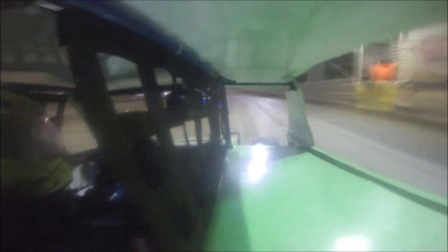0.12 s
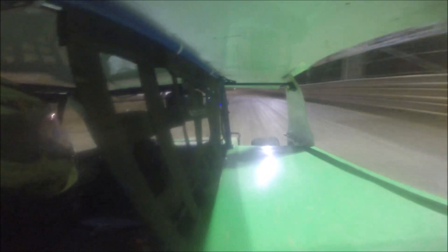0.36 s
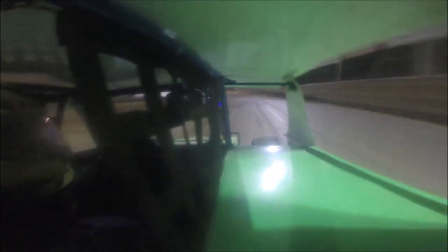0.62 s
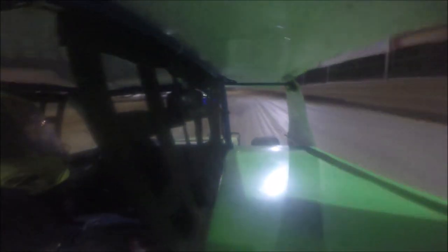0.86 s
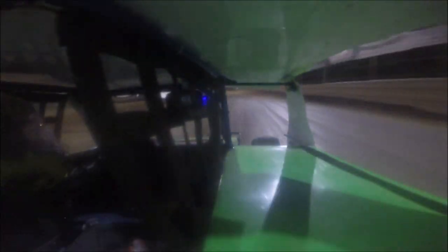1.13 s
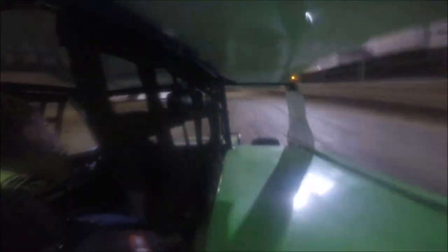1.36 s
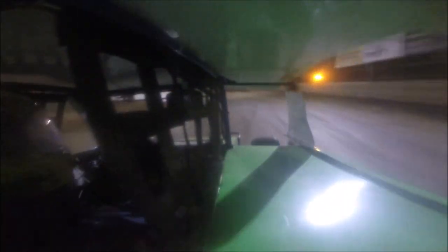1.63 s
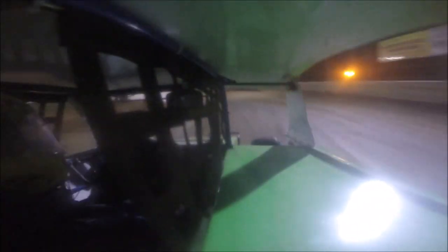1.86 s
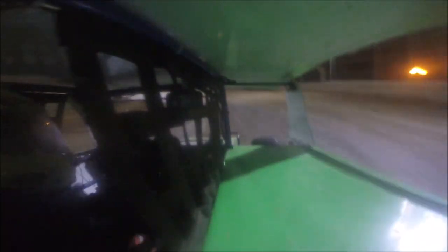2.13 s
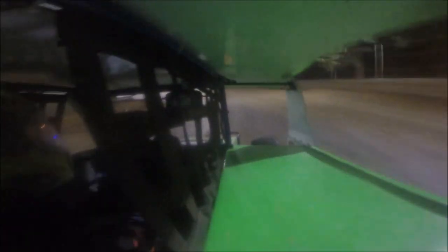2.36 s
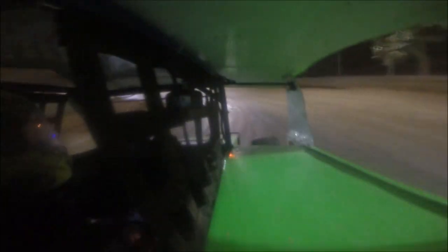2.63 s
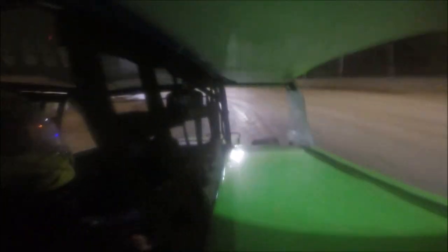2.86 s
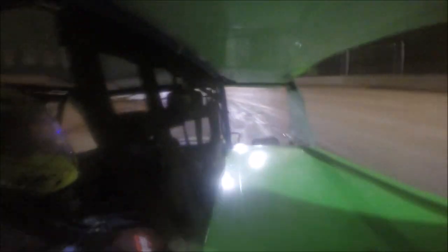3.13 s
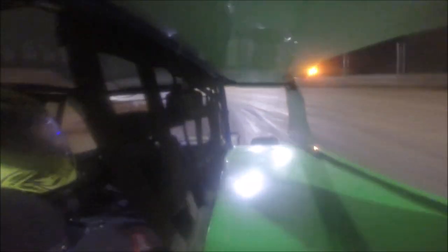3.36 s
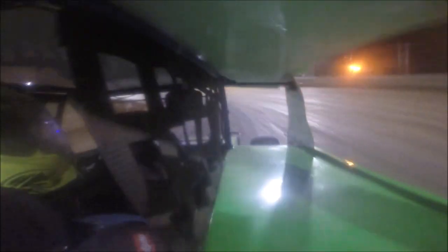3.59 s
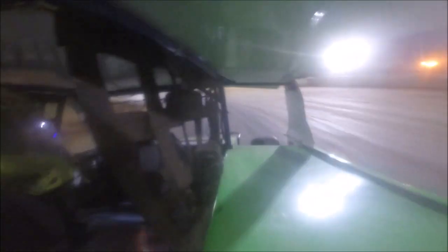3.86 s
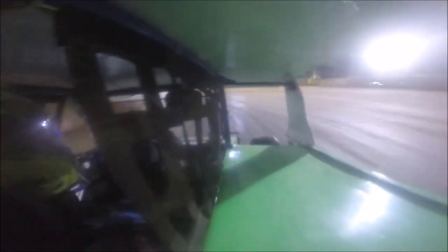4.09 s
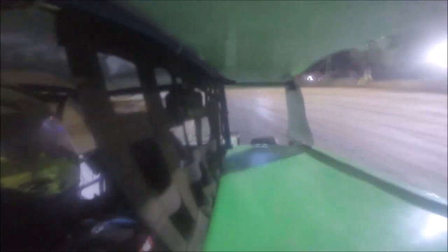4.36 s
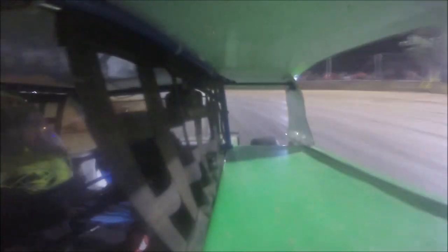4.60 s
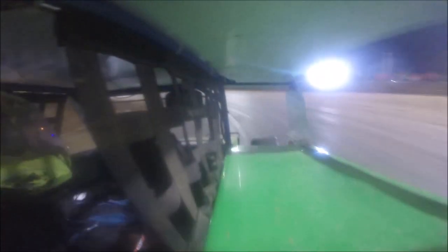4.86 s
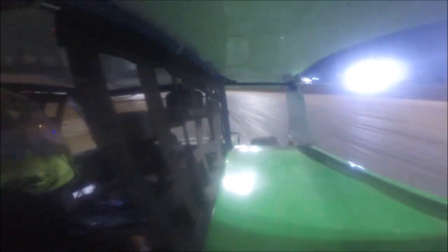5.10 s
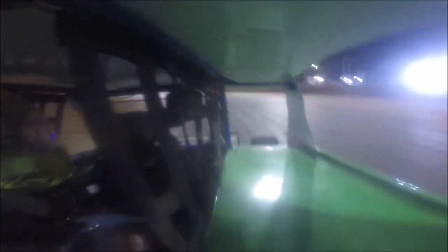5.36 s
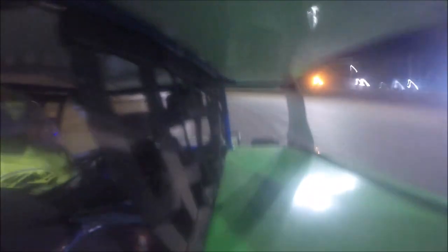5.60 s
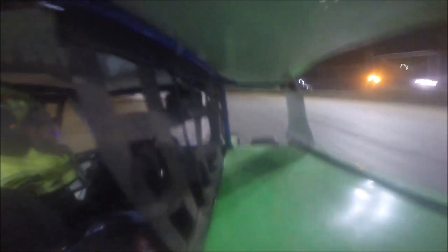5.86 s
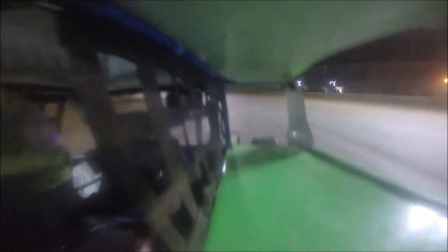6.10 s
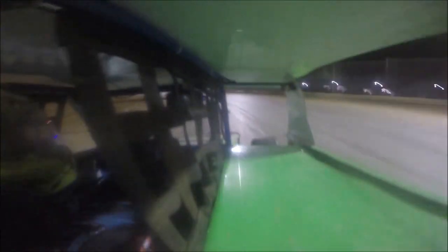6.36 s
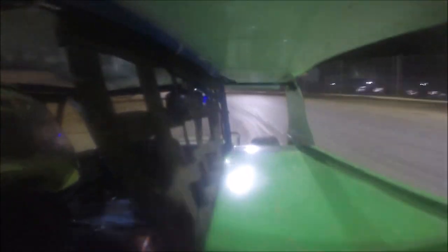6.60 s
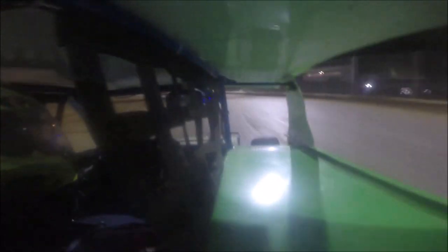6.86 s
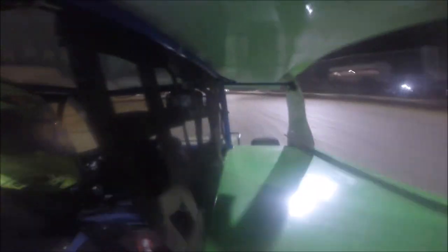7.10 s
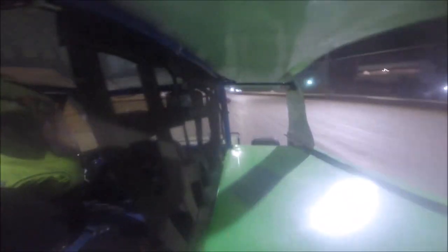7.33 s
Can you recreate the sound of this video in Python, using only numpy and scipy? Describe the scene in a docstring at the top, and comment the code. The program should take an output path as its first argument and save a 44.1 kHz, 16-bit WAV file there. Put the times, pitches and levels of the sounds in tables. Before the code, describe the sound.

A boomy, droning race engine holds high revs, broken up by ruts, with buzzing metallic panel rattle, fine ticking and low road rumble.

```python
"""Race car on dirt

Inside a race car's cockpit on a dirt track, heard by a microphone in a hard case on the cage. Engine tones, a
strong boom and low road noise come through the frame, with dull knocks from clods. Noisy knocks ring the sheet
panels and the case at their own pitches, swelling and breaking off. A bright click sounds at the crest of each
strong bass swing."""
import sys
import numpy as np
from scipy import signal
from scipy.fft import rfft, irfft
from scipy.io import wavfile
from scipy.ndimage import uniform_filter1d, map_coordinates

SR = 44100
rng = np.random.default_rng(int(sys.argv[2]) if len(sys.argv) > 2 else 0)


def natural_amplitude(level_db):
    """Convert a level in decibels to a linear amplitude factor, elementwise."""
    exponent = np.asarray(level_db, float) / 20
    return 10 ** exponent


def dump(signal):
    """Clip the signal to [-1, 1] and save it as 16-bit WAV at the path in sys.argv[1]."""
    limited = np.clip(np.atleast_2d(signal).T, -1, 1)
    pcm = np.round(limited * 32767).astype(np.int16)
    wavfile.write(sys.argv[1], SR, pcm)


N = 329427
TIME_S = np.arange(N) / SR

# Driving: part throttle through the rough turn, hard out of it, easing off from 6.6 s
# [t/s, engine cycle rate f/Hz, throttle 0-1, road rumble level/dB before the jolts shape it]
DRIVE = [(0, 29.75, 0.8, -15.5), (.55, 29.96, 0.8, -16), (.9, 30.77, 0, -16.5), (1.4, 31.44, 0.2, -17.5),
         (1.9, 32.04, 0.4, -17.5), (2.5, 31.83, .4, -20), (3.1, 31.96, 0.4, -16), (3.6, 31.53, 0.3, -20.5),
         (4.1, 30.76, 0.4, -15.5), (4.55, 31.07, 0.1, -20), (5.0, 31.49, 1, -18), (5.6, 33.66, 0.8, -17.5),
         (6.0, 34.81, 0.6, -19.5), (6.41, 35.82, 0.7, -19.5), (6.57, 35.36, 0.7, -23),
         (6.62, 35.06, 0.3, -20.5), (7.18, 33.95, 0, -23.5), (7.47, 33.9, 0.2, -23.5)]
# Ruts that break the boom, which swings up again and holds until the next
# [t/s of the break, boom level/dB after it, before the share and throb below]
RUTS = [(-0.03, -9), (0.045, -21), (0.115, -15), (0.169, -13.5), (0.266, -17.5), (0.334, -14), (0.426, -14),
        (0.601, -10.5), (0.767, -10), (0.835, -12.5), (1.021, -11), (1.119, -12.5), (1.236, -10.5),
        (1.344, -15), (1.411, -14.5), (1.506, -15), (1.619, -17.5), (1.742, -12), (1.859, -17), (2.03, -15),
        (2.112, -11.5), (2.208, -15.5), (2.333, -14.5), (2.419, -12), (2.573, -9), (2.67, -15.5),
        (2.773, -13.5), (2.907, -13), (3.027, -11), (3.091, -21), (3.19, -13), (3.254, -13), (3.369, -12.5),
        (3.554, -13.5), (3.684, -13), (3.763, -13.5), (3.894, -15), (4.047, -14), (4.096, -13.5),
        (4.228, -13), (4.291, -14), (4.364, -16), (4.545, -14.5), (4.639, -13.5), (4.702, -13.5),
        (4.826, -10.5), (4.884, -14), (4.966, -17.5), (5.084, -14), (5.213, -14), (5.329, -13),
        (5.451, -11.5), (5.509, -17), (5.598, -21.5), (5.697, -19.5), (5.856, -16), (6.007, -15),
        (6.113, -13.5), (6.166, -17.5), (6.256, -15), (6.398, -18.5), (6.452, -15.5), (6.547, -12.0),
        (6.681, -11.5), (6.812, -10.5), (6.935, -10), (7.398, -13)]
# Broad tone of the road noise in the frame [f/Hz, relative level/dB]
ROAD_TONE = [(15, -46.5), (26, -35), (33, -9.5), (50, -17), (85, -9), (130, -5.5), (190, -11), (300, -22.5),
             (450, -34.5), (650, -45), (1200, -65), (5000, -120)]
# Broad tone of the rattling panels and case [f/Hz, relative level/dB]
PANEL_TONE = [(300, -12), (600, -20.5), (1200, -15.5), (1700, -8.5), (2300, -12), (3000, -27),
              (4300, -26.5), (4700, -40.5), (7300, -41.5), (8000, -53.5), (11000, -58), (13000, -69.5),
              (15000, -79)]
# Broad tone of the clicks [f/Hz, relative level/dB]
TICK_TONE = [(300, -21.5), (2000, -2.5), (5000, 3.5), (7000, 3.5), (7700, -6), (11000, -15), (13000, -24.5),
             (15000, -40.5)]
# Resonances of the frame [f/Hz, width/Hz, level/dB]
FRAME_RESONANCES = [(40.7, 9, 12), (71.4, 11, 5.5), (143.16, 11, 12.5), (344.2, 54, 7), (480.6, 45, 12)]
# Resonances of panels and case; a minus level is a dip [f/Hz, width/Hz, level/dB]
PANEL_RESONANCES = [(945, 181, 14.5), (1062, 170, -10), (1484.4, 101, 8.5), (1595, 61, 4), (1859, 67, 10),
                    (1874.6, 14, -22.5), (2064, 110, -5), (2280, 160, 4), (2364, 155, 2), (3323, 88, 6.5),
                    (3500, 630, 8), (4920, 190, 6), (5380, 99, -6.5), (5520, 380, 11), (8300, 140, 11.5)]
# Rattle that builds up and breaks off [t/s of the break, gain level/dB, build-up/s, hush level/dB after]
RATTLE_SWELLS = [(0.377, 4.5, 0.023, -4), (0.687, 5.5, 0.11, 9), (1.068, 7, 0.38, -0.5),
                 (1.188, 5.5, 0.17, -1), (1.782, 8, 0.46, 2.5), (1.94, 6, 0.078, 13), (2.129, 6.5, 0.16, 0),
                 (2.38, 5.5, 0.29, 0), (2.619, 4, 1, -5), (2.8, 5, 0.073, 2), (3.058, 3, 0.88, -3.5),
                 (3.251, 5.5, 0.36, 0), (3.44, 3.5, 0.73, 1), (3.821, 6.5, 0.085, 1),
                 (3.97, 7, 0.062, -2.5), (4.169, 5, 0.26, 0), (4.49, 6, 0.14, -3), (4.792, 3.5, 0.17, -5),
                 (5.12, 4, 0.1, 0), (5.243, 7.5, 0.11, 0.5), (5.36, 4, 0.079, 0), (5.468, 3, 0.23, -0.5),
                 (5.57, 5.5, 0.043, 0), (5.752, 4.5, 0.27, -2.5), (6.12, -5, 0.14, -2.5),
                 (6.581, 4.5, 0.53, 0)]
# Edges of the bands for large to small sheets [f/Hz]
SHEET_EDGES = [200, 1100, 2050, 3000]
# Engine tones at multiples of the cycle rate, before jolts, mounts and wavering
# [multiple, level/dB at cruise, level change/dB per Hz of cycle rate, level change/dB per unit of throttle]
ENGINE_ORDERS = [(1, -44.5, 3.5, 11.5), (2, -29.5, 2, 0), (3, -35.5, 0.5, 5.5), (5, -29.5, -1, 11.5),
                 (6, -31.5, 0, 9.5), (7, -40, 1, 5.5), (8, -41, 0, 2.5), (9, -46.5, -0.5, 7),
                 (10, -50, 0, 10.5)]
# Resonances of mounts or exhaust that swell a passing order [f/Hz, width/Hz, level/dB at full throttle]
MOUNT_RESONANCES = [(34.7, 1.2, 10), (100.7, 11, 7.5), (255, 7.8, 9.5), (356, 18, 9.5)]
# Clods that hit the floor pan [t/s, level/dB before the fade]
CLODS = [(1.718, -15.5), (2.977, -19.5), (4.041, -22), (4.751, -25)]

CRUISE_HZ, CRUISE_THROTTLE = 31.5, 0.4
BOOM_ORDER = 4  # boom turns per engine cycle
BOOM_RISE_S, BOOM_FADE_S = 0.011, 0.019  # after a break and before the next
GAP_DB = -13  # depth of a break on the roughest ground
BOOM_SHARE_DB = -2  # the engine's part of a swing
SLIP_TURNS = 0.3  # how far a rut knocks the boom out of step on the roughest ground
THROB_DB, THROB_PER_S = 2, 24  # small ruts between the jolts; the dB is for the roughest ground
LOPSIDED = 0.22  # the frame gives more one way, so crests are pointed
PANELS_DB, PANELS_DB_PER_THROTTLE = -26.5, 3
BITS_DB, BITS_DB_PER_THROTTLE = 0.45, 3.5  # small loose parts against large sheets
FLEX_S = 0.0003  # typical drift of delay that bends the panel resonances
BREAK_S, RECOVER_S = 0.024, 0.14  # fall of the rattle into a hush, and its return
KNOCK_HZ, KNOCK_FADE_S = 331, 0.01


def curve(table):
    """Draw straight lines through each column of a table, one value a sample."""
    s, *columns = np.transpose(table)
    return [np.interp(TIME_S, s, c) for c in columns]


def unit(x):
    """Scale to rms 1."""
    return x / np.sqrt(np.mean(x ** 2))


def walk(rate):
    """Smooth chance that turns about rate times a second; spread 1."""
    k = int(SR / rate)
    steps = np.repeat(rng.standard_normal(N // k + 1), k)
    smooth = uniform_filter1d(uniform_filter1d(steps, k), k)
    return unit(smooth[:N])


def resonance(hz, centre_hz, width_hz):
    """Height of a resonance at hz: 1 at its centre, a half at half its width away."""
    return 1 / (1 + (2 * (hz - centre_hz) / width_hz) ** 2)


def colour(x, shape, modes=()):
    """Filter by a broad tone with resonances on top, sounding only after each input; scale to rms 1."""
    size = 2 ** 15
    hz = np.maximum(np.arange(size // 2 + 1) * SR / size, 1)
    shape_hz, shape_db = np.transpose(shape)
    db = np.interp(np.log(hz), np.log(shape_hz), shape_db)
    db = db + sum(top_db * resonance(hz, f, w) for f, w, top_db in modes)
    cepstrum = irfft(np.log(natural_amplitude(db)))
    # folding the cepstrum gives the least delay
    cepstrum[1:size // 2] *= 2
    cepstrum[size // 2 + 1:] = 0
    response = irfft(np.exp(rfft(cepstrum)))[:size // 2]
    return unit(signal.fftconvolve(x, response)[:N])


def jolts(rough):
    """Ruts cut the boom: its level in dB, the dips alone in dB, and a chance value held for each swing."""
    s, db = np.transpose(RUTS)
    k = np.maximum(np.searchsorted(s, TIME_S) - 1, 0)
    age = TIME_S - s[k]
    left = np.append(s[1:], np.inf)[k] - TIME_S
    rise = 1 - np.exp(-(age / BOOM_RISE_S) ** 2)
    fade = 1 - np.exp(-(left / BOOM_FADE_S) ** 2)
    shape_db = rough ** 0.3 * 20 * np.log10(rise * fade + natural_amplitude(GAP_DB))
    level_db = uniform_filter1d(db[k], size=401)
    chance = uniform_filter1d(rng.standard_normal(len(s))[k], size=401)
    return level_db + shape_db, shape_db, chance


def boom(cycle, db, rough, chance):
    """The fourth engine order booms; on rougher ground each swing strays more in step and level."""
    phase = BOOM_ORDER * cycle + 0.5 + rough ** 3 * SLIP_TURNS * chance
    throb_db = THROB_DB * rough ** 1.5 * walk(THROB_PER_S)
    level = natural_amplitude(db + BOOM_SHARE_DB + throb_db) * np.sqrt(2)
    return level * np.sin(2 * np.pi * phase)


def order_levels(hz, throttle, push, shape_db):
    """Each order's level in dB follows speed, throttle, jolts and the resonances it passes under load."""
    levels_db = []
    for order, db, per_hz, per_push in ENGINE_ORDERS:
        db = db + per_hz * (hz - CRUISE_HZ) + per_push * push + 0.31 * shape_db
        for f, w, top_db in MOUNT_RESONANCES:
            db = db + top_db * throttle * resonance(order * hz, f, w)
        levels_db.append((order, db))
    return levels_db


def engine(cycle, levels_db, rough):
    """Orders in step make one firing a cycle stand out as a sharp fall; rough ground makes them waver."""
    tones = 0
    late = 0.02 * rough * walk(12)
    for order, db in levels_db:
        level = natural_amplitude(db + 3.5 * np.sqrt(rough) * walk(18)) * np.sqrt(2)
        stray = 0.055 * rough * order * walk(12)  # radians
        tones = tones - level * np.sin(2 * np.pi * order * (cycle + late) + stray)
    return tones


def road(db):
    """Tyres on ruts shake the frame: low noise in uneven lumps."""
    lumps = natural_amplitude(1.2 * walk(16) + 2.1 * walk(40)) * rng.standard_normal(N)
    return natural_amplitude(db) * colour(lumps, ROAD_TONE, FRAME_RESONANCES)


def lopsided_frame(bass):
    """The frame gives more one way: a squared part, less its local mean, sharpens the crests."""
    square = bass ** 2
    return bass + LOPSIDED * (square - uniform_filter1d(square, size=701))


def swells():
    """Rattle gain in dB: a steady climb to each break, a quick fall into a hush, a slower return."""
    climbs, hushes = [], []
    for s, gain_db, build_s, hush_db in RATTLE_SWELLS:
        climbs.append(np.interp(TIME_S, [s - build_s, s, s + BREAK_S], [0, gain_db, 0]))
        hushes.append(np.interp(TIME_S, [s, s + BREAK_S, s + BREAK_S + RECOVER_S], [0, hush_db, 0]))
    # the highest climb and the deepest hush win, so climbs below 0 and hushes above 0 do nothing
    return np.max(climbs, axis=0) + np.min(hushes, axis=0)


def band(x, hz, kind):
    """Keep one band of frequencies."""
    return signal.sosfilt(signal.butter(4, hz, kind, fs=SR, output="sos"), x)


def panels(cycle, db, bits_db, shake):
    """Dense knocks of unequal size, thicker once an engine cycle, ring the sheet metal and the case."""
    hits = rng.standard_normal((2, N)) * natural_amplitude(1.76 * rng.standard_exponential((2, N)))
    once = np.cos(2 * np.pi * cycle + 1.62 * walk(6))
    shared_db = shake * (1.3 * walk(25) + 1.3 * walk(90))
    sheets = unit(hits[0] * natural_amplitude(1.7 * shake * once + shared_db))
    # small loose parts carry the treble and follow the engine cycle more closely
    bits = unit(hits[1] * natural_amplitude(2.9 * shake * once + shared_db + 1.5 * shake * walk(18)))
    both = band(natural_amplitude(bits_db) * bits, SHEET_EDGES[-1], "high")
    # large and small sheets each come and go on their own, each band 10 ms after the one below
    for k, edges in enumerate(zip(SHEET_EDGES, SHEET_EDGES[1:])):
        shifted = np.roll(sheets, k * SR // 100)
        both = both + natural_amplitude(1.32 * shake * walk(15)) * band(shifted, edges, "band")
    ringing = colour(both, PANEL_TONE, PANEL_RESONANCES)
    # the sheets flex with the chassis, so their resonances bend up and down
    bent = np.arange(N) + SR * FLEX_S * walk(9)
    return natural_amplitude(db) * map_coordinates(ringing, [bent], mode="mirror")


def ticks(bass):
    """A bright click sounds at each strong crest of the bass, as a rule harder the higher the swing."""
    swing = unit(uniform_filter1d(bass, size=61))
    crest = signal.find_peaks(swing, height=0.4, distance=150)[0]
    blows = np.zeros(N)
    luck = natural_amplitude(2.4 * rng.standard_normal(len(crest)))
    blows[crest] = np.tanh(swing[crest] / 1.7) ** 2.1 * luck
    fade = np.exp(-1 / (0.0016 * SR))  # noise after each blow dies away in 1.6 ms
    burst = rng.standard_normal(N) * signal.lfilter([1], [1, -fade], blows)
    return natural_amplitude(-50.5) * colour(blows + 0.27 * burst, TICK_TONE)


def knocks():
    """Clods knock the floor pan: short dull tones that fade at once."""
    out = 0
    for s, db in CLODS:
        age = np.maximum(TIME_S - s, 0)
        out = out + natural_amplitude(db) * np.exp(-age / KNOCK_FADE_S) * np.sin(2 * np.pi * KNOCK_HZ * age)
    return out


def scene():
    """Engine and road through the frame, with panels, ticks and knocks over them."""
    hz, throttle, rumble_db = curve(DRIVE)
    cycle = np.cumsum(hz) / SR  # engine cycles so far
    push = throttle - CRUISE_THROTTLE
    rough = natural_amplitude(rumble_db - rumble_db.max())  # 1 on the roughest ground
    boom_db, shape_db, chance = jolts(rough)
    levels_db = order_levels(hz, throttle, push, shape_db)
    bass = boom(cycle, boom_db, rough, chance)
    bass = bass + engine(cycle, levels_db, rough)
    bass = bass + road(rumble_db + 0.54 * shape_db)
    bass = lopsided_frame(bass)
    panels_db = PANELS_DB + PANELS_DB_PER_THROTTLE * push + swells()
    bits_db = BITS_DB + BITS_DB_PER_THROTTLE * push
    rattle = panels(cycle, panels_db, bits_db, np.sqrt(rough))
    return (bass + rattle + ticks(bass) + knocks())[None]


def low_pass(x):
    """Removes everything above the highest recorded frequency."""
    return signal.sosfilt(signal.butter(12, 15070, fs=SR, output="sos"), x)


def record(dry):
    """Gain control gently evens out the swells; the highest swings are rounded."""
    loudness = np.sqrt(uniform_filter1d(dry ** 2, size=1301) + 1e-4)
    evened = dry * (0.21 / loudness) ** 0.063
    mix = 0.95 * np.tanh(evened / 0.95)
    return low_pass(mix)


dry = scene()
out = record(dry)
dump(out)
```